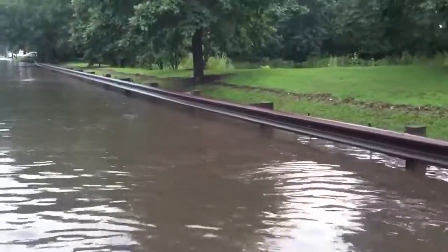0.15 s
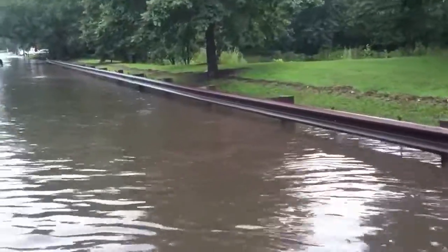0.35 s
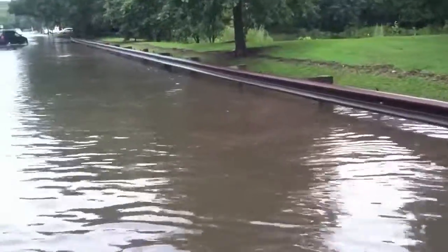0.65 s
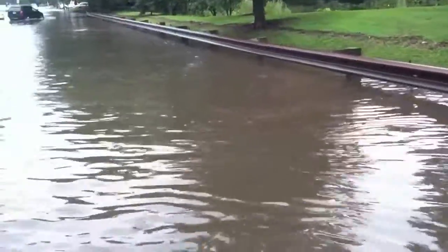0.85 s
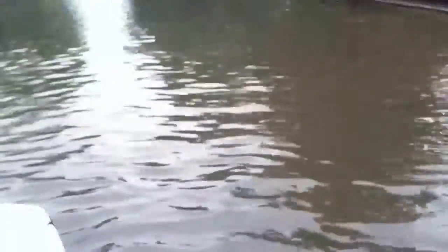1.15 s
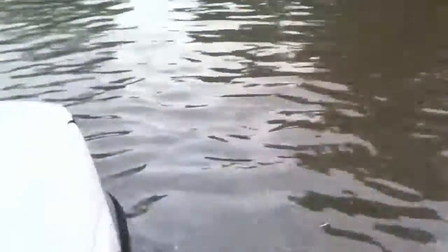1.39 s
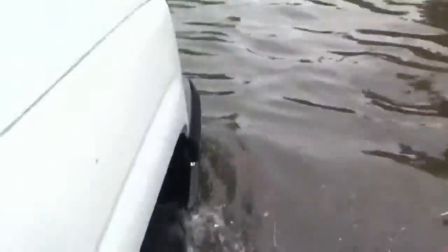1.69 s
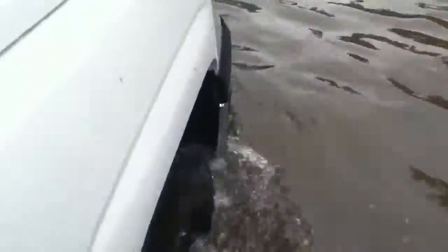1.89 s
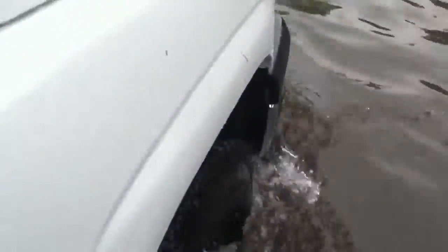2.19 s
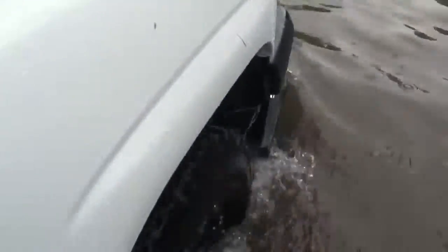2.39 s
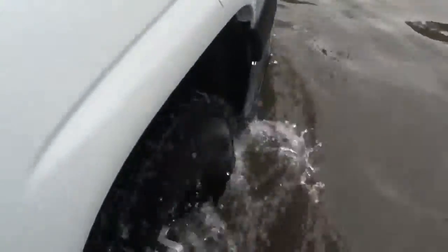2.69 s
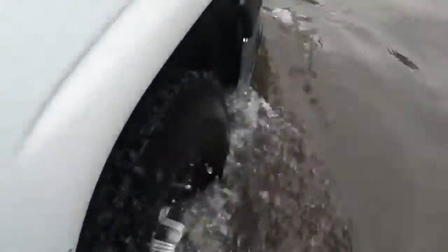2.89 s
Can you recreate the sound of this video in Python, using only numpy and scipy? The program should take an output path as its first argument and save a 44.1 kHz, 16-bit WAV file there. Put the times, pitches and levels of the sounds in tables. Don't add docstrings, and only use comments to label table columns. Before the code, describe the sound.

Vehicle wheel churns through deep floodwater, rushing and bubbling over a low, throbbing engine rumble

```python
import sys
import numpy as np
from scipy import signal
from scipy.io import wavfile

SR = 44100
rng = np.random.default_rng(int(sys.argv[2]) if len(sys.argv) > 2 else 0)


def voltage_ratio(level):
    return 10 ** (np.asarray(level, float) / 20)


def master_out(mix):
    frames = np.transpose(np.atleast_2d(mix))
    ceiling = np.clip(frames, -1, 1)
    pcm = np.round(ceiling * 32767).astype(np.int16)
    wavfile.write(sys.argv[1], SR, pcm)


N = 134505

# start_s, cycles_per_s (all six cylinders fire once per cycle)
ENGINE_SPEED = [(0.0, 5.796), (0.3, 5.842), (0.6, 5.878), (0.75, 6.028), (0.9, 6.206), (1.2, 6.284),
                (1.5, 6.343), (1.9, 6.38), (2.3, 6.449), (2.5, 6.624), (2.7, 6.848), (2.85, 6.998),
                (3.05, 7.101)]
FIRING_PLACES = [
    [-.046, .075, .306, .505, .661, .833],
    [-.04, .23, .306, .472, .689, .839],
    [-.038, .224, .349, .466, .653, .794],
    [.04, .142, .318, .474, .622, .802],
    [-.12, .052, .282, .435, .669, .767],
]
# six columns, level_db
FIRING_LEVELS = [
    [8, 18, 11, 16, 15, 18.5],
    [19.9, 17.5, 13.4, 20.7, 17.8, 14],
    [21.1, 19, 16.6, 22.2, 21, 22],
    [17, 17, 21, 21.8, 7.2, 25.8],
    [18.2, 14.2, 25.5, 13, 25.5, 21.7],
]
LOAD_STARTS = [4, 10, 15, 17]
# pitch_hz, width_hz, level_db
PIPE_RESONANCES = [
    (157.1, 30.3, 0.5),
    (204.9, 26.8, 0),
    (263.5, 8.2, -14.5),
]
# start_s, level_db
GAS_ROAR = [(0, -49), (.8, -48), (1.5, -48), (2.4, -46), (3.05, -46)]
# start_s, second_harmonic_db, third_harmonic_db, belt_hum_db
ENGINE_TONES = [(0, -63, -44.5, -51.5), (.7, -60, -46.5, -70), (.9, -59, -48, -38),
                (1.3, -55, -47.5, -39.5), (1.8, -55, -49.5, -39.5), (2.4, -76, -51, -40.5),
                (2.75, -58, -53, -34.5), (3.05, -53, -45, -32)]
# multiple_of_cycle, level_db
IDLE_OVERTONES = [(15, -59), (25, -48), (33, -47), (34, -45), (36, -46)]
# start_s, level_db
WHEEL_LEVEL = [(.1, -52.5), (.25, -53), (.7, -52.5), (1.0, -52), (1.25, -51), (1.35, -49.5), (1.6, -49),
               (1.8, -48), (1.95, -46.5), (2.1, -45.5), (2.25, -46.3), (2.45, -46), (2.55, -46.5),
               (2.65, -44), (2.75, -45.5), (3.05, -44)]
# pitch_hz, level_db (per Hz)
RUSH_COLOUR = [(30, -4.5), (90, 2.5), (250, 0.5), (500, -1), (1000, -8), (2500, -13), (5000, -19.5),
               (12000, -25.5)]
# peak_s, level_db, pitch_hz, length_ms
SPRAY_DROPS = [(0.0346, -39, 8100, 1.5), (0.0573, -40, 8530, 0.5), (0.0732, -38, 8100, 0.5),
               (0.1107, -39, 7800, 1.1), (0.121, -37, 7320, 1.0), (0.1302, -37, 8010, 0.5),
               (0.2691, -37, 8660, 1.1), (0.3348, -40, 8790, 0.8), (0.3697, -40, 8270, 1.2),
               (0.3768, -38, 9780, 0.4), (0.4514, -35, 8610, 0.5), (0.6059, -37, 9040, 0.3),
               (0.7073, -40, 7970, 1.1), (0.7163, -41, 7580, 0.5), (0.7786, -40, 8480, 0.8),
               (0.794, -39, 9090, 1.4), (0.7998, -39, 8830, 0.4), (0.8355, -34, 8480, 0.5),
               (0.9658, -40, 7710, 0.9), (0.9876, -37, 9040, 0.6), (1.0954, -39, 9260, 1.5),
               (1.1249, -37, 7240, 0.9), (1.1912, -36, 9600, 1.3), (1.2889, -37, 8610, 0.5),
               (1.2947, -31, 8740, 1.2), (1.3622, -27, 7800, 0.3), (1.3724, -37, 8230, 1.8),
               (1.3991, -32, 8700, 0.3), (1.5479, -35, 7360, 1.2), (1.6083, -36, 8480, 0.5),
               (1.6509, -35, 8530, 0.7), (1.6926, -34, 8530, 0.9), (1.7853, -31, 8700, 0.3),
               (1.8123, -35, 7920, 0.7), (1.9485, -34, 7880, 1.0), (2.0203, -33, 8530, 0.8),
               (2.0673, -32, 7410, 1.0), (2.1091, -29, 8310, 0.7), (2.1191, -33, 8530, 1.3),
               (2.1362, -33, 9170, 1.1), (2.1946, -33, 8180, 0.3), (2.333, -33, 10030, 1.0),
               (2.4005, -34, 7620, 0.8), (2.4124, -33, 7710, 1.7), (2.4385, -32, 8610, 0.2),
               (2.6061, -30, 8530, 1.1), (2.6136, -32, 8310, 0.6), (2.6678, -23, 9300, 0.5),
               (2.6952, -30, 7410, 0.5), (2.7423, -33, 8310, 1.3)]
# start_s, level_db, pitch_hz, fade_s (time to fall 60 dB)
LARGE_BUBBLES = [(0.114, -37.5, 2300, 0.027), (.125, -48, 4760, 0.028), (.32, -41, 650, 0.032),
                 (.953, -37.5, 1420, 0.019), (0.971, -34, 1550, 0.013), (1.15, -47, 745, 0.16),
                 (1.372, -40, 4900, 0.016), (1.378, -36, 820, 0.023), (1.915, -39, 900, 0.041),
                 (1.95, -36, 573, 0.06), (1.958, -34, 730, 0.042), (2.425, -38, 3860, 0.029),
                 (2.01, -44, 1550, 0.049), (2.055, -46, 1340, 0.054), (2.09, -42, 648, 0.087),
                 (2.166, -37, 2630, 0.018), (2.24, -45, 1860, 0.11), (2.241, -41, 1533, 0.043),
                 (2.198, -50, 3040, 0.018), (2.199, -46, 3380, 0.06), (2.225, -43, 3350, 0.026),
                 (2.227, -40.5, 890, 0.041), (2.4, -40, 4040, 0.023), (2.408, -50, 2760, 0.034),
                 (2.322, -46, 4200, .025), (1.925, -43.5, 2330, 0.057), (1.134, -50, 2170, 0.06),
                 (1.22, -46, 2580, 0.045), (1.722, -48, 2170, 0.057), (1.755, -46, 2650, 0.058),
                 (.78, -44, 580, .05), (2.806, -41, 2730, 0.036), (3.0, -48, 590, 0.045),
                 (2.688, -37, 725, .05), (2.325, -45, 2620, 0.067), (2.41, -36, 347, 0.1),
                 (2.425, -32, 558, 0.043), (2.48, -47, 1280, 0.13), (2.58, -43, 874, 0.059),
                 (2.62, -39, 518, 0.1), (2.742, -36.5, 424, 0.11), (2.985, -39.5, 1200, 0.046)]

MIC_HZ, MIC_WIDTH_HZ, MIC_DB = 8440, 1810, 14.5


def rms_one(x):
    return x / np.sqrt(np.mean(x ** 2) + 1e-20)


def in_time(rows):
    start_s, *columns = np.transpose(rows)
    return [np.interp(np.arange(N) / SR, start_s, column) for column in columns]


def drift(rate_hz):
    r = np.exp(-20 * np.pi * rate_hz / SR)
    slow = signal.lfilter([1], [1, -2 * r, r * r], rng.standard_normal(N // 10 + 8002))
    slow = slow[8000:]
    return np.interp(np.arange(N) / 10, np.arange(len(slow)), rms_one(slow - slow.mean()))


def resonate(x, hz, width_hz):
    r = np.exp(-np.pi * width_hz / SR)
    top = [1 - r * r, 0, r * r - 1]
    bottom = [2, -4 * r * np.cos(2 * np.pi * hz / SR), 2 * r * r]
    return signal.lfilter(top, bottom, x + 1e-18)


def grains(per_s, spread_db, low_hz, high_hz, turns, count):
    sizes = np.minimum(rng.exponential(1, N), 3)
    clicks = voltage_ratio(spread_db * sizes) * rng.choice([-1, 1], N) * (rng.random(N) < per_s / SR)
    dealt = rng.integers(0, count, N)
    out = np.zeros(N)
    for k, hz in enumerate(np.geomspace(low_hz, high_hz, count)):
        width_hz = 3.8 * hz / turns
        ring = resonate(resonate(clicks * (dealt == k), hz, width_hz), hz, width_hz)
        out += ring / np.sqrt(hz)
    return rms_one(out)


def engine():
    cycle = np.cumsum(in_time(ENGINE_SPEED)[0]) / SR
    return pipe(firing(cycle)) + gas_roar() + idle_singing(cycle) + engine_tones(cycle)


def firing(cycle):
    jitter_s, spread_db = .0003, 1.5
    whole = np.arange(0, int(cycle[-1]) + 2)
    load = np.searchsorted(LOAD_STARTS, whole, side="right")
    at = np.interp(whole[:, None] + np.array(FIRING_PLACES)[load], cycle, np.arange(N))
    at = at + jitter_s * SR * rng.standard_normal((len(whole), 6))
    db = np.array(FIRING_LEVELS)[load] + spread_db * rng.standard_normal(at.shape)
    inside = (at > 90) & (at < N - 90)
    pulses = np.zeros(N)
    pulses[at[inside].astype(int)] = voltage_ratio(db[inside])
    return pulses


def pipe(x):
    out = 0
    for k, (hz, width_hz, db) in enumerate(PIPE_RESONANCES):
        out = out + (-1) ** k * voltage_ratio(db) * resonate(resonate(x, hz, width_hz), hz, width_hz)
    return out


def gas_roar():
    noise = pipe(rng.standard_normal(N + SR))[SR:]
    return voltage_ratio(in_time(GAS_ROAR)[0]) * rms_one(noise)


def idle_singing(cycle):
    fade_db = np.interp(np.arange(N) / SR, (.6, .9), [0, -20])
    out = 0
    for multiple, db in IDLE_OVERTONES:
        level = voltage_ratio(db - 3 + fade_db + 0.68 * drift(6.4))
        out = out + level * np.sin(2 * np.pi * (np.round(multiple) * cycle + rng.random()))
    return out


def engine_tones(cycle):
    second_db, third_db, hum_db = in_time(ENGINE_TONES)
    second = voltage_ratio(second_db + 3) * np.sin(24 * np.pi * cycle)
    third = voltage_ratio(third_db + 3 + 1.3 * drift(6)) * np.cos(36 * np.pi * cycle)
    hum = voltage_ratio(hum_db + 0.5) * np.cos(2 * np.pi * (22.955 * cycle + .57))
    return second + third + hum


def wheel():
    surge = 1.3 * np.tanh(0.1 * drift(9) + 0.8 * drift(55))
    fizz = grains(4000 * voltage_ratio(3.0 * surge), spread_db=5.0, low_hz=1460, high_hz=12000, turns=1.56, count=14)
    spray = grains(1500 * voltage_ratio(2.7 * surge), spread_db=5.0, low_hz=3280, high_hz=12800, turns=3.0, count=6)
    bubbles = grains(800 * voltage_ratio(3.0 * drift(8)), spread_db=3.5, low_hz=300, high_hz=1500, turns=16.0, count=24)
    droplets = grains(1200 * voltage_ratio(3.0 * surge), spread_db=5.0, low_hz=600, high_hz=4200, turns=8.0, count=16)
    water = voltage_ratio(1.5) * rush(surge, patchy_db=2.0, shared_db=1.5)
    water = water + voltage_ratio(-13) * fizz + voltage_ratio(-9) * droplets + voltage_ratio(-11) * bubbles + voltage_ratio(-20) * spray
    return voltage_ratio(in_time(WHEEL_LEVEL)[0]) * water


def rush(surge, patchy_db, shared_db):
    edges = 24 * 2 ** np.arange(0, 9.6, .5)
    white = rng.standard_normal((2, N))
    colour_hz, colour_db = np.transpose(RUSH_COLOUR)
    out = 0
    for k, (low, high) in enumerate(zip(edges, edges[1:])):
        hz = np.sqrt(low * high)
        band_filter = signal.butter(2, [low, high], "band", fs=SR, output="sos")
        band = signal.sosfilt(band_filter, white[k % 2])
        share = np.clip(np.log2(hz / 700) / 3, 0, 1)
        db = np.interp(np.log(hz), np.log(colour_hz), colour_db)
        out = out + band * voltage_ratio(db + patchy_db * drift(16.8) + shared_db * share * surge)
    return rms_one(out)


def spray_drops():
    out, t = np.zeros(N + SR), np.arange(SR // 8) / SR
    for peak_s, db, hz, ms in SPRAY_DROPS:
        age = 3e3 * t / ms
        rough = 0.8 * ms * rms_one(resonate(rng.standard_normal(len(t)), hz, 4000))
        snap = age * np.exp(-age) * (np.sin(2 * np.pi * hz * t) + rough)
        mist = np.diff(rng.standard_normal(len(t) + 1)) * voltage_ratio(-16 - 60 * t / .02)
        lift = 1 + (voltage_ratio(MIC_DB) - 1) / np.hypot(1, 2 * (hz - MIC_HZ) / MIC_WIDTH_HZ)
        level = voltage_ratio(db + 0.5 + 3.5 * ms) / lift
        start = int((peak_s - ms / 3e3 - .0002) * SR)
        out[start:][:len(t)] += level * (snap / np.abs(snap).max() + mist)
    return out[:N]


def large_bubbles():
    out, t = np.zeros(N + SR), np.arange(SR // 8) / SR
    for start_s, db, hz, fade_s in LARGE_BUBBLES:
        shape = (1 - np.exp(-t / 0.0025)) * voltage_ratio(db - 60 * t / fade_s)
        flutter = rms_one(resonate(rng.standard_normal(len(t)), hz / 10, hz / 10))
        shape = shape * (1 + .5 * flutter)
        delays_s = (0, *rng.uniform(0.0019, 0.0083, 2))
        for side, late_s in zip((0, -1, 1), delays_s):
            pitch_hz = hz * (1 + side * .0025 / fade_s)
            tone = np.sin(2 * np.pi * pitch_hz * t * (1 + .04 * t / fade_s))
            out[int((start_s + late_s) * SR):][:len(t)] += voltage_ratio(-7 * abs(side)) * shape * tone
    return out[:N]


def wash():
    hz, width_hz = 284, 102
    noise = resonate(resonate(rng.standard_normal(N), hz, width_hz), hz, width_hz)
    return voltage_ratio(-55) * rms_one(noise)


def scene():
    mix = engine() + wheel() + spray_drops() + large_bubbles() + wash()
    return mix[None, :]


def low_pass(x):
    return signal.sosfilt(signal.butter(12, 15600, fs=SR, output="sos"), x)


def record(dry):
    x = dry + (voltage_ratio(MIC_DB) - 1) * resonate(dry, MIC_HZ, MIC_WIDTH_HZ)
    x = signal.sosfilt(signal.butter(4, 11200, fs=SR, output="sos"), x)
    x = signal.sosfilt(signal.butter(2, 79, "high", fs=SR, output="sos"), x)
    return low_pass(x)


dry = scene()
out = record(dry)
master_out(out)
```